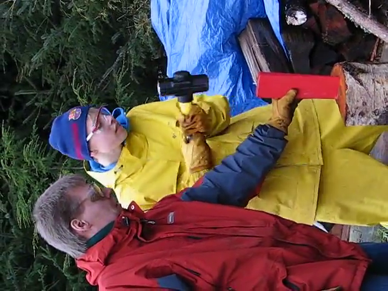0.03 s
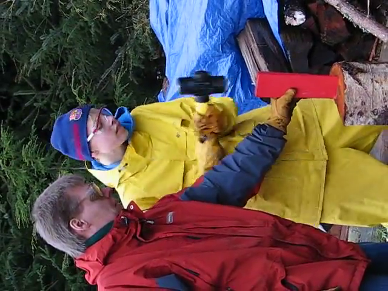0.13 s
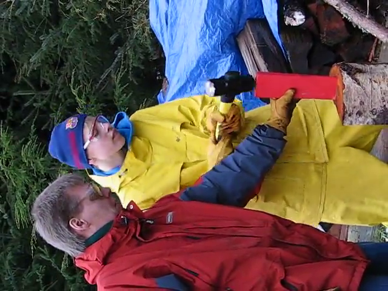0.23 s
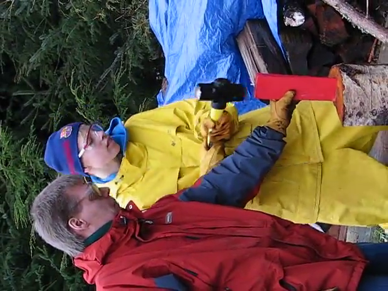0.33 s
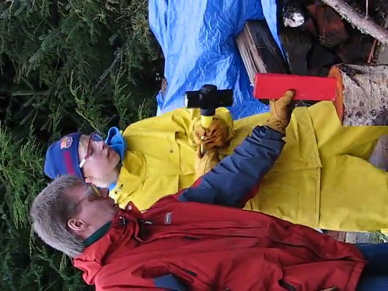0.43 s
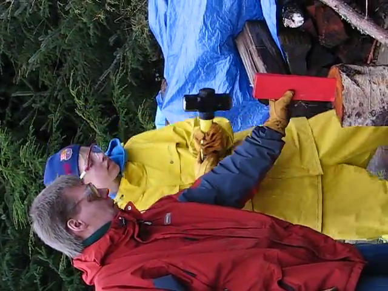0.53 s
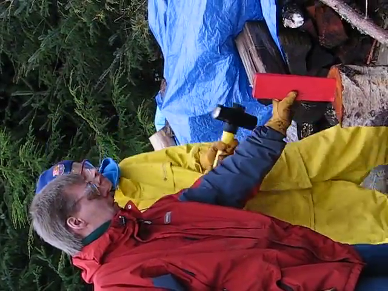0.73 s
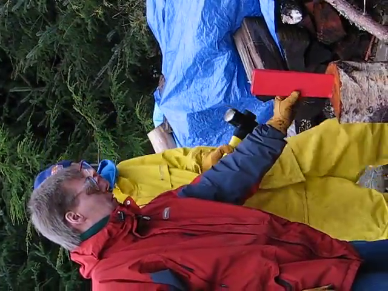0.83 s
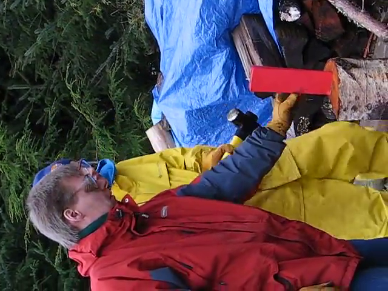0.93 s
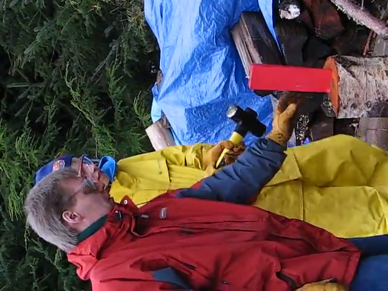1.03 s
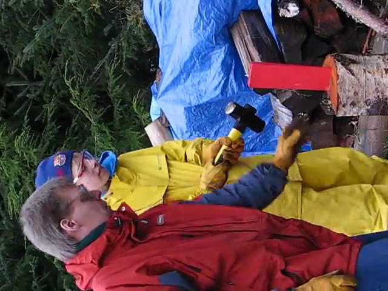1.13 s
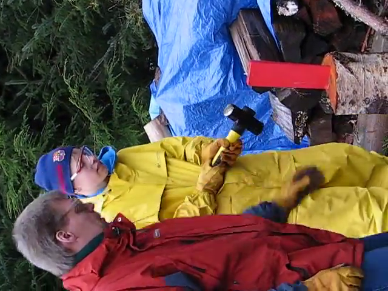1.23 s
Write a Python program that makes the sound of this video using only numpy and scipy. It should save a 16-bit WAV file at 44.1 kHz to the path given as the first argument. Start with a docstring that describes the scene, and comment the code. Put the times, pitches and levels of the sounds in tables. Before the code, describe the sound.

Outdoors, a single close hammer blow cracks against a metal wedge set in a log, ringing briefly with a knock of wood. A light echo dies away, leaving only a faint, even wash of distant noise.

```python
"""Outdoors, over a steady, distant wash, a small sledge hammer hits a metal wedge in a log once, close by.
The wedge cracks and clanks, briefly overloading the microphone, and the log stops it with a woody knock.
The blow splashes off nearby surfaces, the wedge jolts once more in its cleft and the ground thuds.
Trees scatter back a thin echo, and rain gear rustles faintly as it dies away."""
import sys
import numpy as np
from scipy import signal
from scipy.fft import rfft, irfft
from scipy.io import wavfile
from scipy.ndimage import uniform_filter1d

SR = 44100
rng = np.random.default_rng(int(sys.argv[2]) if len(sys.argv) > 2 else 0)


def put_to_file(sound):
    """Save the sound as 16-bit audio at rate SR, in the file named by the first command-line argument."""
    columns = np.atleast_2d(sound).T  # one column per channel
    safe = np.clip(columns, -1, 1)
    whole_steps = np.round(safe * 32767)
    wavfile.write(sys.argv[1], SR, whole_steps.astype(np.int16))


N = 57330

BLOW_S, JOLT_S = 0.2157, 0.2412
LOG_START_S = BLOW_S + 0.001
# colour of the crack of metal on metal and tearing wood fibres: frequency_hz, relative_db
CRACK_COLOUR = [(100, -25), (300, 0.5), (700, 5), (1000, 3), (1300, 5), (1800, -10), (2100, -2), (3300, -5),
                (4200, -8.5), (5200, -11), (6200, -2.5), (7200, -8), (9700, -1.5), (11000, -9.5),
                (12500, -30), (14000, -70)]


def amp(db):
    """Decibels to gain."""
    return 10 ** (np.asarray(db) / 20)


def unit(x):
    """Scales to rms 1."""
    return x / np.sqrt(np.mean(x ** 2) + 1e-20)


def read(points, hz):
    """Reads a table on a log-frequency axis."""
    point_hz, value = np.transpose(points)
    return np.interp(np.log(hz + 1), np.log(point_hz + 1), value)


def since(start_s):
    """Seconds since the start, zero before it."""
    return np.maximum(np.arange(N) / SR - start_s, 0)


def noise(colour):
    """Steady noise of a given colour, rms 1."""
    gain = amp(read(colour, np.fft.rfftfreq(N, 1 / SR)))
    return unit(irfft(rfft(rng.standard_normal(N)) * gain, N))


def ring(start_s, modes, rise_s):
    """Decaying modes that build up over the contact; neighbours swing opposite ways."""
    t = since(start_s)
    tones = sum((-1) ** k * amp(db - 60 * t / t60) * np.sin(2 * np.pi * hz * t)
                for k, (hz, db, t60) in enumerate(modes))
    return (1 - np.exp(-t / rise_s)) * tones


def burst(start_s, colour, decay, rise_s):
    """Noise that swells quickly and dies at its own speed in each band."""
    hz, t, bands = signal.stft(noise(colour), SR, nperseg=256, noverlap=192)
    fade = amp(-60 * np.maximum(t - start_s, 0) / read(decay, hz)[:, None])
    fading = signal.istft(bands * fade, SR, nperseg=256, noverlap=192)[1][:N]
    return fading * (1 - np.exp(-since(start_s) / rise_s))


def wedge(bite_db=7, bite_s=0.0063):
    """The hammer cracks on the wedge and rings it; a kick back in the wood rings it again, duller."""
    # modes of the wedge: pitch_hz
    pitches = [1162, 1342, 1490, 1630, 2150, 2455, 2810, 3040, 3490, 4268, 4650]
    # the same modes, quickly damped by the wood: blow_db, jolt_db, t60_s
    modes = [(-12, -16, .042), (-11, -19.5, 0.045), (-7, -14, 0.049), (-27.5, -43, 0.03),
             (-13.5, -26, 0.028), (-28.5, -21, 0.032), (-13.5, -32, 0.013), (-23.5, -41, 0.042),
             (-26, -36, 0.061), (-28, -57, 0.09), (-16, -52, 0.013)]
    # decay of the crack: frequency_hz, t60_s
    crack_decay = [(200, 0.075), (1400, 0.087), (3000, 0.08), (6000, 0.054), (11000, 0.025)]
    blow_db, jolt_db, t60 = np.transpose(modes)
    clank = ring(BLOW_S, zip(pitches, blow_db, t60), rise_s=0.00067)
    crack = amp(-15.5) * burst(BLOW_S, CRACK_COLOUR, crack_decay, rise_s=0.00014)
    jolt = ring(JOLT_S, zip(pitches, jolt_db, t60), rise_s=0.0013)
    bite = amp(bite_db * np.exp(-(since(BLOW_S) / bite_s) ** 2))  # harder while the wedge drives in
    return bite * (clank + crack) + jolt


def log(thump_lag_s=0.004, thump_width_s=0.00381, thump_hz=301.7):
    """The log stops the wedge with a short thump and rings woodily."""
    # modes of the log: pitch_hz
    pitches = [191, 272, 351, 449, 515, 625, 765, 912]
    # strength and decay of those modes: level_db, t60_s
    modes = [(-25, 0.2), (-20, 0.09), (-17, 0.12), (-15.5, .08), (-14.5, .055), (-21.5, 0.088), (-23, 0.14),
             (-15.5, 0.036)]
    t = since(0) - BLOW_S - thump_lag_s
    thump = -amp(-4.5) * np.exp(-(t / thump_width_s) ** 2) * np.cos(2 * np.pi * thump_hz * t)
    knock = ring(LOG_START_S, zip(pitches, *np.transpose(modes)), rise_s=0.0007)
    return (since(BLOW_S) > 0) * thump + knock


def ground(rock_lag_s=0.045):
    """The blow pushes the log into the soil; a moment later the log rocks on it."""
    # thud of the first push: pitch_hz, level_db, t60_s
    push_modes = [(48, -27, .06), (85, -33, .05)]
    # ground modes under the rocking log: pitch_hz, level_db, t60_s
    rock_modes = [(25, -35, .45), (40, -40, 0.27), (66, -42, .15)]
    push = ring(LOG_START_S, push_modes, rise_s=0.0007)
    return push + ring(BLOW_S + rock_lag_s, rock_modes, rise_s=0.009)


def echoes(splash_lag_s=0.011, splash_width_s=0.0094):
    """The crack splashes off the ground and nearby bodies; trees and woodpile add a diffuse tail."""
    # colour of the scattered tail: frequency_hz, relative_db
    tail_colour = [(100, 4.5), (200, -6), (350, 9), (600, -3), (1000, -5), (1380, -0.5), (1490, 7),
                   (1600, -2), (1800, -3), (2600, -7.5), (3100, -9.5), (3550, -4.5), (4300, -10),
                   (5100, -18), (6000, -7), (7000, -10.5), (9000, -5.5), (10500, -12), (12000, -27),
                   (13000, -70)]
    # decay of the tail: frequency_hz, t60_s
    tail_decay = [(200, 0.43), (1400, 0.87), (3500, 0.76), (7000, 0.59), (11000, 0.41)]
    splash = noise(CRACK_COLOUR) * np.exp(-((since(0) - BLOW_S - splash_lag_s) / splash_width_s) ** 2)
    tail = burst(BLOW_S, tail_colour, tail_decay, rise_s=0.0084)
    return amp(-26.5) * splash + amp(-30.5) * tail


def rustles(grain_db=3):
    """Stiff rain gear shifts in soft swells of grainy hiss."""
    # movements of the cloth: peak_s, width_s, level_db
    moves = [(0.69, .025, -68), (1.05, 0.013, -68), (1.192, 0.046, -65)]
    # colour of the cloth hiss: frequency_hz, relative_db
    colour = [(500, -20), (2500, 0), (6000, 1), (9800, -5), (11200, -24), (12500, -55)]
    t = since(0)
    swell = sum(amp(db) * np.exp(-((t - peak_s) / width_s) ** 2) for peak_s, width_s, db in moves)
    grain = unit(uniform_filter1d(rng.standard_normal(N), size=90))
    return swell * unit(noise(colour) * amp(grain_db * grain))


def wash(level_db=-43, waver_db=0.28, opening_db=1.9, settle_s=0.17, top_hz=11200):
    """A bed of distant outdoor noise, slightly stronger at first, wavering a little."""
    # colour of the bed: frequency_hz, relative_db
    colour = [(12, -36), (20, -8), (54, -1), (91, -5.5), (261, -7), (282, -6), (418, -4), (653, -5.5),
              (967, -4), (1910, -13), (2620, -15), (9710, -31.5), (10500, -32.5), (13600, -53),
              (22000, -120)]
    waver = unit(uniform_filter1d(rng.standard_normal(N), size=3000))
    air = signal.sosfilt(signal.butter(10, top_hz, fs=SR, output="sos"), noise(colour))
    return air * amp(level_db + waver_db * waver + opening_db * np.exp(-since(0) / settle_s))


def scene():
    """The blow, its echoes and the background, in mono."""
    return (wedge() + log() + ground() + echoes() + rustles() + wash())[None]


def record(dry):
    """The microphone soft-clips on the attack; then the top treble rolls off to a steep band limit."""
    ceiling, knee = 0.72, 6
    treble_hz, edge_hz = 12700, 16400
    clipped = dry / (1 + abs(dry / ceiling) ** knee) ** (1 / knee)
    dulled = signal.sosfilt(signal.butter(3, treble_hz, fs=SR, output="sos"), clipped)
    band_limit = signal.firwin(255, edge_hz, window=("kaiser", 9), fs=SR)
    return signal.oaconvolve(dulled, band_limit[None], "same")


dry = scene()
out = record(dry)
put_to_file(out)
```